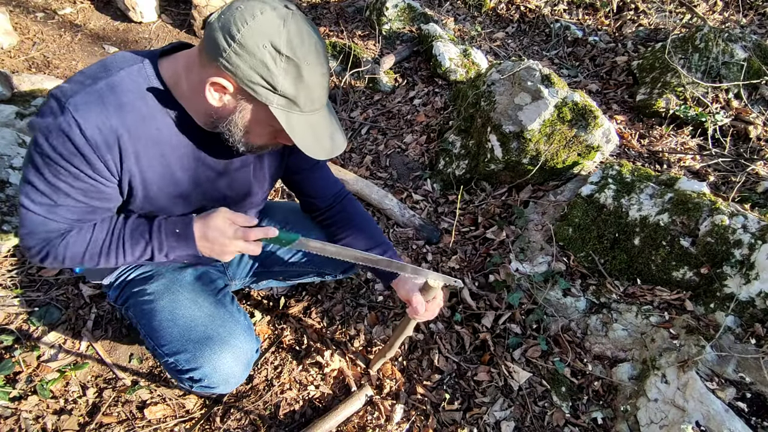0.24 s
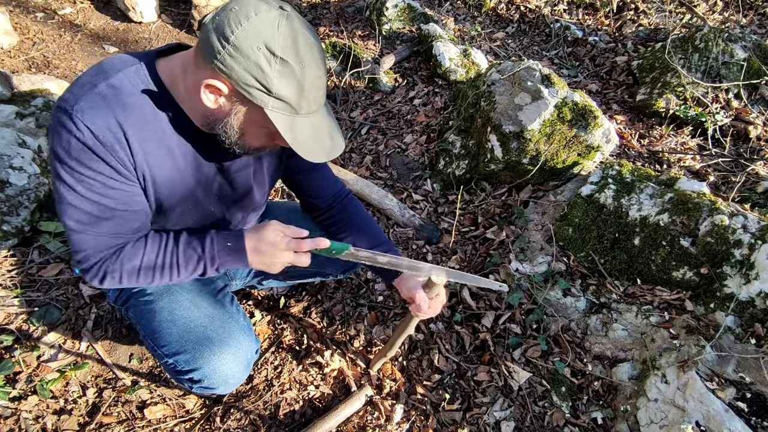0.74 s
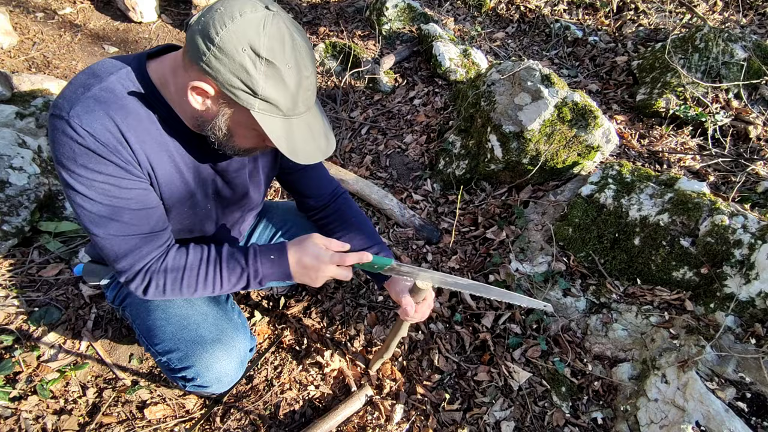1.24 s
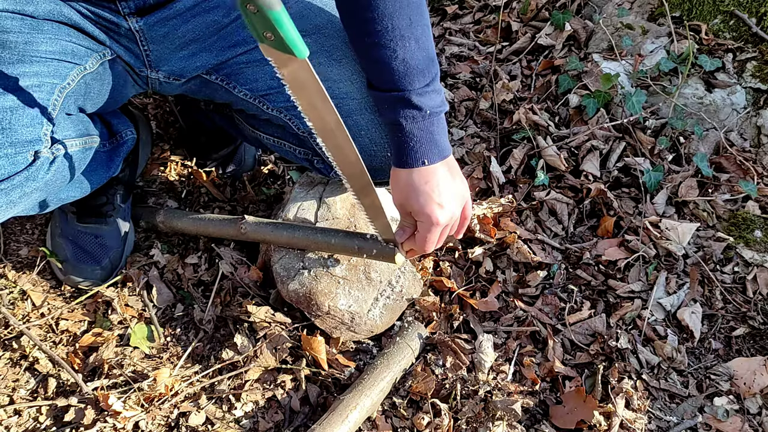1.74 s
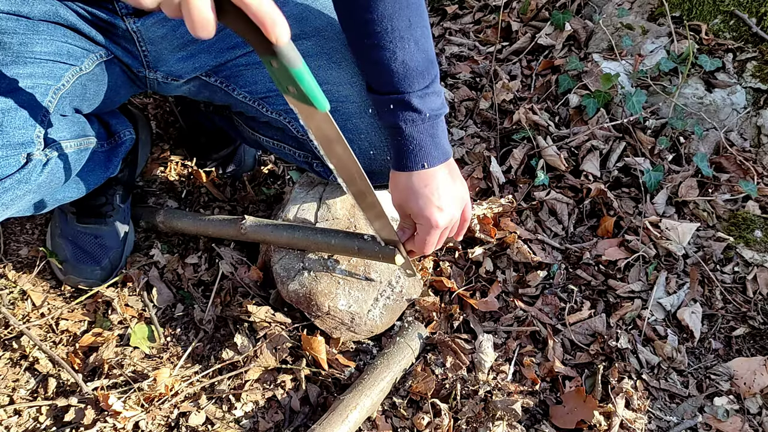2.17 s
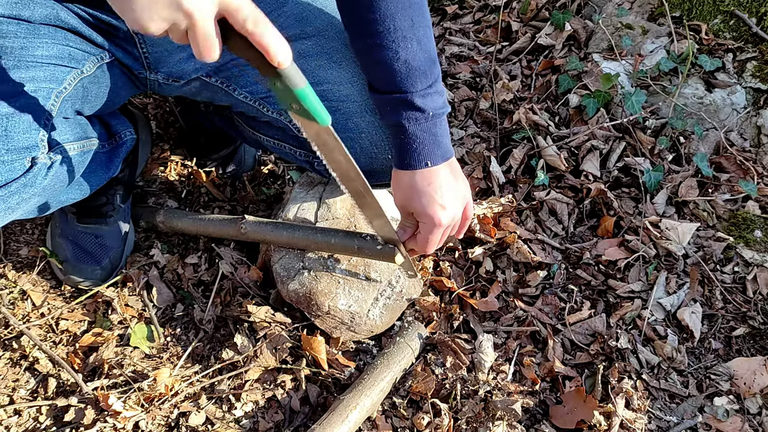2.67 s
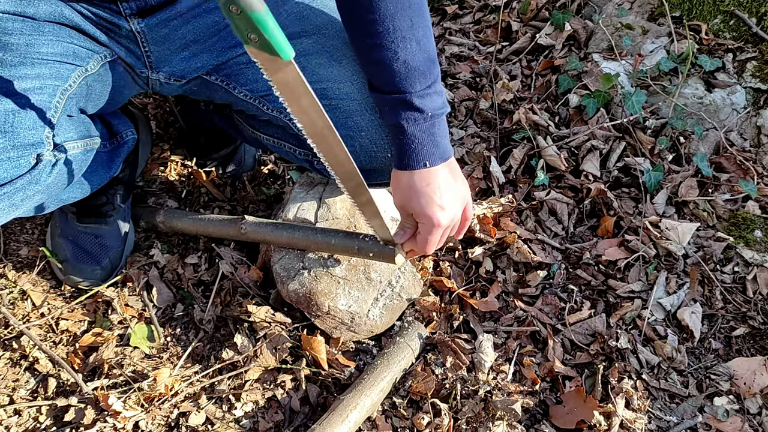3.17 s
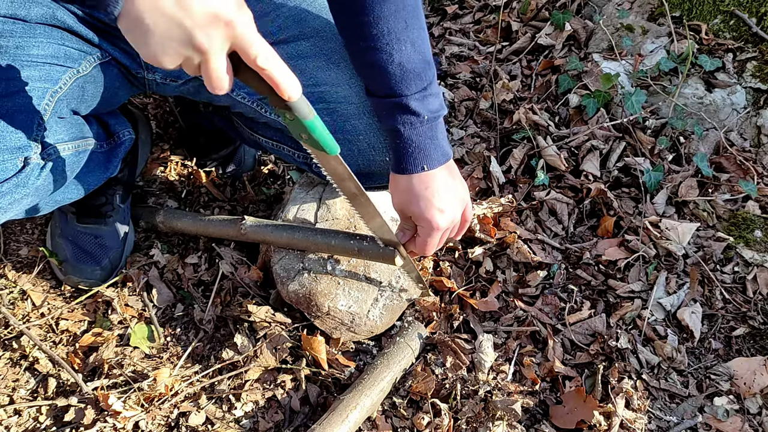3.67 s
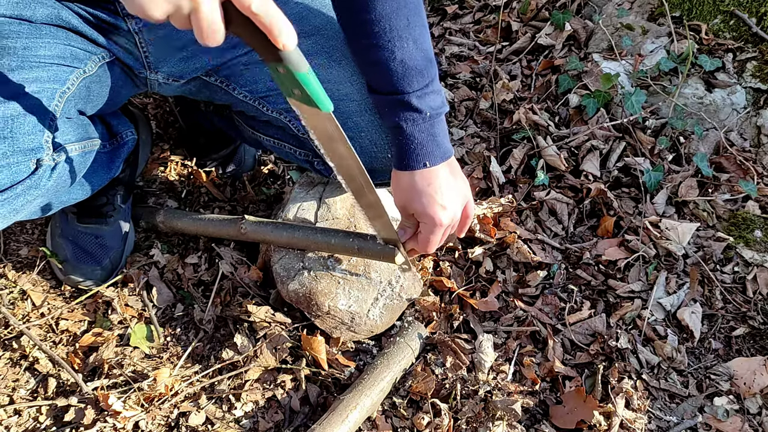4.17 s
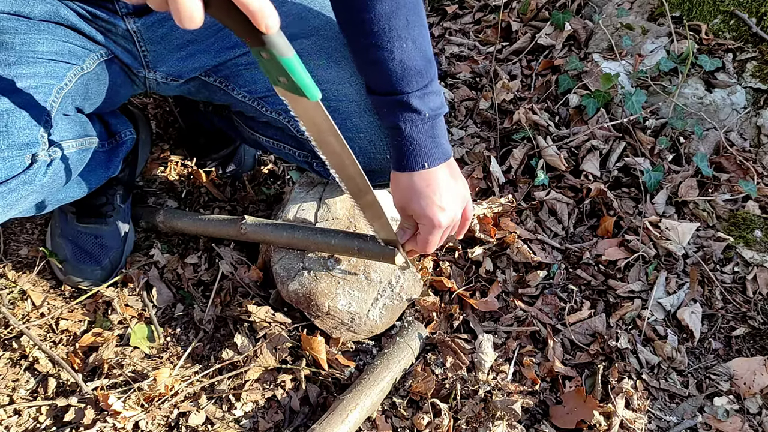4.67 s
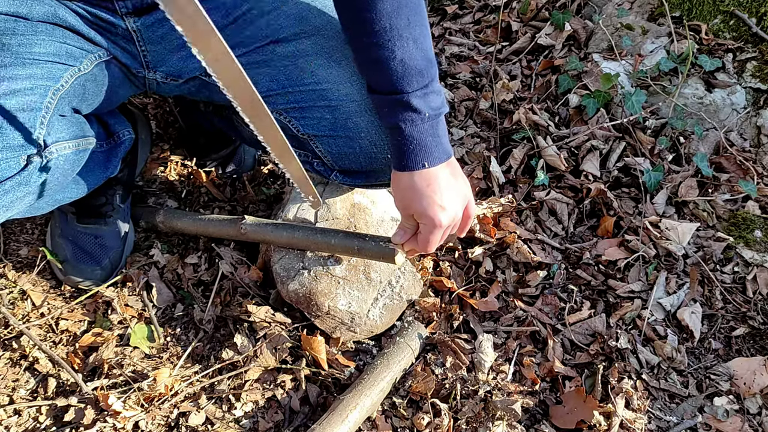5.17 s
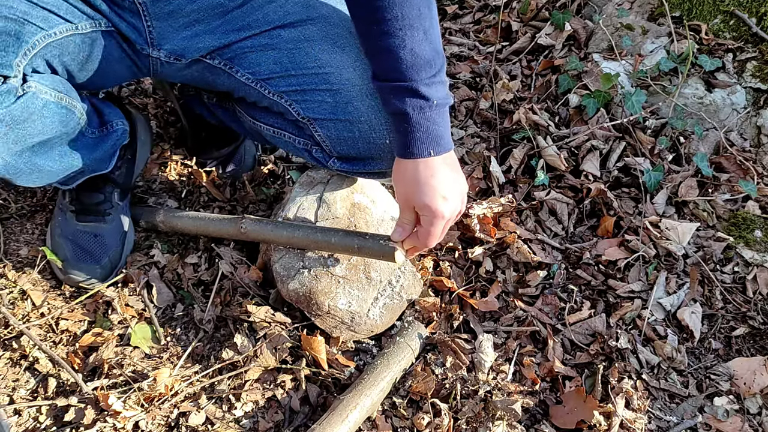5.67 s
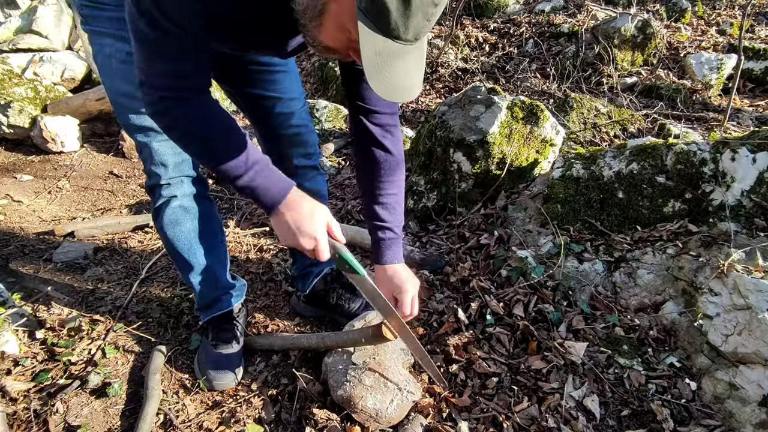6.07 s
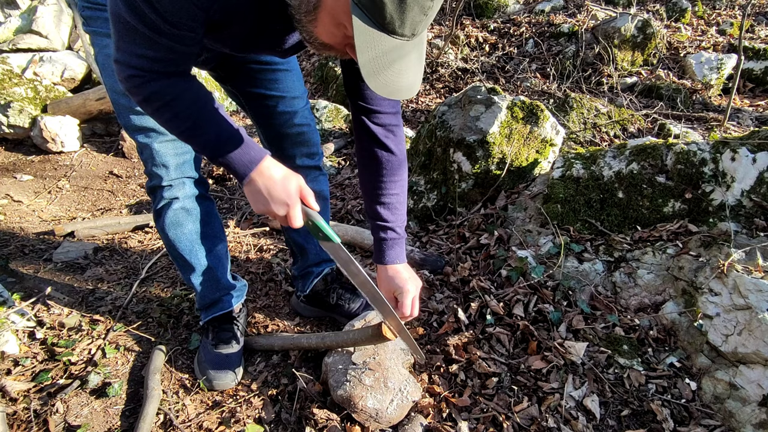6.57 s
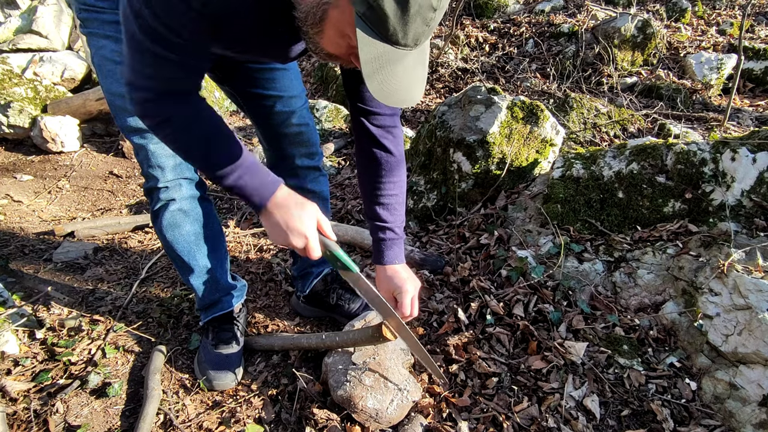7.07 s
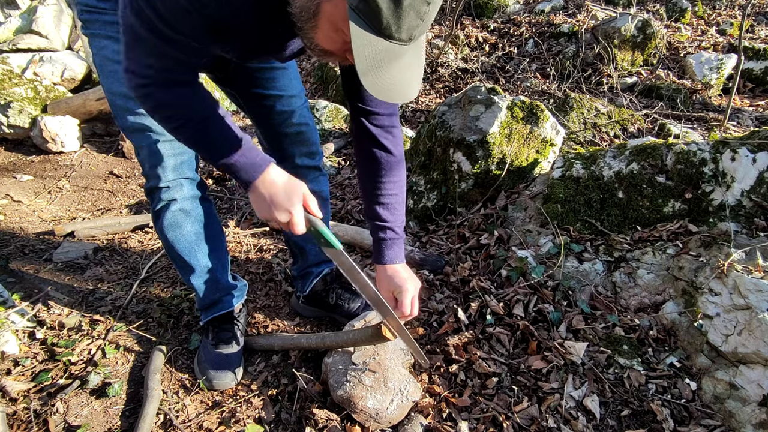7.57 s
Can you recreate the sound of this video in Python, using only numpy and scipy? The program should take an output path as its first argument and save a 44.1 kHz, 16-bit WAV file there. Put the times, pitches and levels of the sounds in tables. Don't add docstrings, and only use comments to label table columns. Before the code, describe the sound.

Slow sawing of fresh wood quickens to brisk rasps under microphone wind bursts, then turns loud, fast and juddering in a quiet forest.

```python
import sys
import numpy as np
from scipy import signal
from scipy.fft import rfft, irfft
from scipy.io import wavfile
from scipy.ndimage import uniform_filter1d

SR = 44100
rng = np.random.default_rng(int(sys.argv[2]) if len(sys.argv) > 2 else 0)


def amplitude_ratio(level_db):
    exponent = np.asarray(level_db, float) / 20
    return 10 ** exponent


def to_wav(sig):
    pcm = np.clip(np.atleast_2d(sig), -1, 1) * 32767
    pcm = np.round(pcm).astype(np.int16)
    wavfile.write(sys.argv[1], SR, pcm.T)


N = 344862
T = np.arange(N) / SR
HZ = np.fft.rfftfreq(N, 1 / SR) + 1

# (start [s], tooth spacing scatter [0-1], tooth size scatter [dB], fibre thud [dB], hush [dB])
PLACES = [
    (0, 0.09, 3.5, -3.5, -63),
    (1.326, 0.04, 2, -1, -62.5),
    (5.844, 0, 3, 0.5, -61.5),
]
# (frequency [Hz], width [Hz], level [dB])
BRANCH_MODES = [
    [(294.5, 81.2, -0.5), (410, 81, -6.5), (595, 117, -11), (774.3, 83, -9), (1100, 520, -33.5)],
    [(200, 114, -3.5), (318, 135, 0), (379.7, 58.6, -0.5), (686, 100, -17.5), (1059, 540, -22)],
    [(160, 115, -10.5), (295.9, 105, -2), (412, 96.2, -6), (579, 33.3, -13), (880, 330, -55),
     (1150, 113, -18.5)],
]
# (frequency [Hz], density [dB per Hz])
HISS_COLOUR = [(290, -32), (500, -5.5), (1240, -5), (1850, -11), (2800, -12), (7130, -7), (8240, -1),
               (11100, -7.5), (15500, -19)]
# (frequency [Hz], width [Hz], level [dB])
BLADE_MODES = [(1820, 105, -3), (2700, 300, 1.5), (3040, 260, 3), (3840, 840, 3), (4634, 176, 4.5),
               (5180, 104, 13.5), (5250, 100, -9.5), (6230, 340, 1.5), (6710, 250, 5), (7140, 270, 4),
               (12265, 575, 6), (12230, 146, -2), (13200, 376, 0), (13150, 200, 1), (13930, 350, 6),
               (14600, 350, 13.5), (15400, 450, -12)]
# (frequency [Hz], width [Hz], level [dB])
PORT_CAVITIES = [
    [(6550, 280, 5.5), (7790, 2570, -12), (9484, 324, 1), (10250, 1300, 3.5), (11300, 270, -13)],
    [(7170, 392, -8), (8140, 1040, 3.5), (9510, 230, -13), (10880, 780, -10), (11350, 350, -5.5)],
]
# (frequency [Hz], density [dB per Hz])
HUSH_COLOUR = [(180, -28), (300, -6), (1560, -15), (2000, -21), (4800, -24.5), (7370, -27), (8280, -25),
               (11100, -28), (12100, -29.5), (15500, -32)]
# (time [s], left level [dB], right level [dB])
WIND_LEVELS = [(0.1, -57, -53), (0.4, -58, -61), (1.0, -51.5, -55.5), (1.251, -55, -58), (1.45, -51, -48.5),
               (2.0, -54, -54.5), (2.35, -54.5, -55.5), (2.9, -63, -60), (3.3, -54, -51.5),
               (3.6, -53, -43.5), (3.95, -57, -42.5), (4.3, -46.5, -53), (5.0, -53.5, -52),
               (5.201, -50.5, -41), (5.7, -49.5, -57), (6.1, -58, -49.5), (6.5, -64, -63.5),
               (7.82, -66, -62)]
# (frequency [Hz], density [dB])
WIND_COLOUR = [(20, -34), (45, -8.5), (75, 0), (110, 0), (170, -5.5), (260, -13), (450, -30.5),
               (1000, -73.5)]
# (frequency [Hz], correlation [0-1])
LIKENESS = [(300, 0.93), (1200, 0.52), (2000, 0.04), (4000, 0.73), (6000, 0.11), (15000, 0)]
# (start [s], length [s], hiss [dB], knock [dB], tooth rate at full speed [Hz])
SLOW_STROKES = [
    (-0.13, 0.3663, -42, -64, 164.6),
    (0.295, 0.33, -45, -59.5, 147),
    (0.66, 0.37, -43, -61.5, 151.2),
    (1.07, 0.391, -47, -60, 149.3),
]
BRISK_STROKES = [(1.311, 0.1706, -44, -51, 129.4), (1.493, 0.15, -43, -48.5, 145.5),
                 (1.631, 0.2206, -46.5, -52.5, 133.3), (1.828, 0.17, -44.5, -49, 140),
                 (1.983, 0.1989, -46.5, -52, 135.5), (2.162, 0.1593, -42, -48.5, 143.2),
                 (2.336, 0.1758, -45.5, -52, 124.1), (2.52, 0.1482, -42.5, -48.5, 150.6),
                 (2.694, 0.17, -45.5, -54, 124.9), (2.9, 0.14, -43.5, -49, 135.5),
                 (3.074, 0.19, -44, -51, 140), (3.255, 0.19, -43, -50.5, 147.4),
                 (3.452, 0.17, -44.5, -51, 135), (3.618, 0.16, -42.5, -48.5, 150.8),
                 (3.789, 0.2, -45.5, -54.5, 128.9), (3.981, 0.1608, -42, -49, 141),
                 (4.146, 0.19, -45.5, -52.5, 127), (4.339, 0.16, -42.5, -50, 140.2),
                 (4.525, 0.16, -43.5, -49, 142.5), (4.693, 0.19, -43.5, -48, 129)]
BREAKTHROUGH = [
    (4.91, 0.2, -46, -49, 125.2),
    (5.075, 0.07, -40.5, -48.5, 129.5),
]
SCRAPES = [
    (5.74, 0.07, -52, -72.5, 149.8),
    (5.847, 0.035, -44.5, -51.5, 200),
]
HARD_STROKES = [(5.885, 0.18, -37, -56.5, 151.1), (6.073, 0.16, -37.5, -44, 155.5),
                (6.228, 0.18, -38, -58, 163.9), (6.412, 0.16, -37, -40.5, 190.5),
                (6.558, 0.17, -37.5, -48.5, 179.7), (6.735, 0.16, -35, -40, 200),
                (6.882, 0.18, -36, -45, 171.8), (7.063, 0.17, -34.5, -42.5, 209.7),
                (7.226, 0.17, -37, -43, 179.9), (7.399, 0.17, -34.5, -42.5, 208.6),
                (7.566, 0.1714, -36.5, -51, 156.6), (7.743, 0.19, -35, -50.5, 191.3)]
# (full pressure at share [0-1], full speed at share [0-1], speed lost at the ends [0-1],
# knock rise over the stroke [dB], softness of the ends [0-3])
DRAG = (0.19, 0.6, 0.2127, -4, 0.92)
PUSH, PULL = (0.59, 0.52, 0.75, 0.1, 1.33), (0.7393, 0.62, 0.7, 12, 1.687)
BREAK, GRAZE = (0.581, 0.6, 0.5, 1.9, 1.05), (0.26, 0.1455, 0.9, -16, 1.3)
HARD_PUSH, HARD_PULL = (0.46, 0.4, 0.4, 3.2, 1.33), (0.67, 0.55, 0.75, 2.06, 1.74)
SAWING = [(SLOW_STROKES, [DRAG]), (BRISK_STROKES, [PUSH, PULL]), (BREAKTHROUGH, [BREAK]),
          (SCRAPES, [GRAZE]), (HARD_STROKES, [HARD_PUSH, HARD_PULL])]
# (centre [s], half length [s], knock [dB], tooth rate [Hz])
CHATTER = [(5.946, 0.0151, -32.5, 160), (5.967, 0.013, -30, 124.7), (6.005, .03, -40.5, 124.3),
           (6.166, .028, -36.5, 152.2), (6.318, 0.02097, -32.5, 148.5), (6.488, .012, -40.5, 154.2),
           (6.534, 0.013, -55, 154.9), (6.851, 0.0154, -57.5, 157.5), (7.009, .028, -36, 152.9),
           (7.124, .012, -43.5, 160), (7.343, 0.01842, -50, 164.6), (7.478, 0.0088, -46, 160),
           (7.539, 0.01566, -47, 145.1), (7.666, 0.029, -33.5, 154.2), (7.815, 0.013, -39.5, 147.7)]
# (time [s], peak level [dB])
PUFFS_LEFT = [(0.502, -35), (2.123, -33), (2.153, -33.5), (3.926, -34), (4.144, -36.5), (4.25, -33.5),
              (4.281, -32), (4.31, -28), (4.437, -30), (4.472, -36), (4.539, -32.5), (5.053, -39),
              (5.102, -39), (5.221, -34), (5.3, -24), (5.332, -40), (5.382, -32), (5.403, -40.5),
              (5.433, -38), (5.563, -40), (5.67, -40)]
PUFFS_RIGHT = [(1.473, -32.5), (1.552, -38), (1.703, -34), (1.981, -36), (2.58, -27), (3.358, -28),
               (3.382, -29), (3.546, -28), (3.569, -26), (3.599, -22), (3.629, -28), (3.654, -24.5),
               (3.724, -25), (3.811, -17), (3.882, -26), (3.919, -29), (4.098, -30), (4.429, -29.5),
               (4.764, -33.5), (5.103, -32), (5.149, -23), (5.185, -27), (5.241, -45), (5.586, -22.5),
               (5.602, -23.5)]

PUFF_HZ = 117.5
TOP_HZ = 15700
PATCH_DB, PATCH_FROM_HZ = 3, 1490
HOLE_DB, HOLE_RARITY = -45, 1.0
SWAY_DB = -9.5
CUT_S = 0.0092
THUD_SPREAD_DB, GUST_SPREAD_DB, FIBRE_SPREAD_DB = 4, 1.5, 1.8


def unit(x):
    return x / np.sqrt(np.mean(x ** 2))


def slope(points):
    hz, value = np.transpose(points)
    return np.interp(np.log(HZ), np.log(hz), value)


def bumps(modes):
    return sum(db / (1 + (2 * (HZ - hz) / width) ** 2) for hz, width, db in modes)


def tint(x, db):
    return irfft(rfft(x) * amplitude_ratio(db), N)


def walk(rate):
    hold = int(SR / rate)
    steps = np.repeat(rng.standard_normal(N // hold + 1), hold)
    slewed = uniform_filter1d(uniform_filter1d(steps, hold), hold)
    return unit(slewed[:N])


def pair():
    like = np.clip(slope(LIKENESS), 0, 0.999)
    mid, side = rfft(rng.standard_normal((2, N))) * np.sqrt([1 + like, 1 - like])
    return irfft([mid + side, mid - side], N) / np.sqrt(2)


def ring(x, modes):
    out = 0
    for k, (hz, width, db) in enumerate(modes):
        b, a = signal.iirpeak(hz, hz / width, SR)
        out = out + (-1) ** k * amplitude_ratio(db) * signal.lfilter(b, a, x)
    return out


def saw_strokes():
    hiss, knock, rate = np.zeros(N), np.zeros(N), np.full(N, 60.0)
    for table, habits in SAWING:
        for k, (start, length, hiss_db, knock_db, hz) in enumerate(table):
            full, fastest, bend, rise_db, soft = habits[k % len(habits)]
            on = (T >= start) & (T < start + length)
            u = (T[on] - start) / length
            pressure = np.where(u < full, u / full, (1 - u) / (1 - full))
            hiss[on] = amplitude_ratio(hiss_db) * np.sin(np.pi / 2 * pressure) ** soft
            knock[on] = amplitude_ratio(knock_db + rise_db * (u - 0.5)) * np.sin(np.pi * u)
            rate[on] = hz * np.clip(1 - bend * (2 * (u - fastest)) ** 2, 0.3, 1)
    return hiss, knock, rate


def branch_knocks(knock, rate, loose, place):
    scatter, size_db, thud_db = np.array(PLACES)[place, 1:4].T
    cycles = np.cumsum(rate * (1 + scatter * loose * walk(120))) / SR
    tooth = cycles.astype(int)
    sizes = amplitude_ratio(size_db * loose * rng.standard_normal(N // 50)[tooth])
    blows = np.diff(tooth, prepend=0) * sizes * np.sqrt(SR / rate)
    thuds = loose * amplitude_ratio(thud_db + THUD_SPREAD_DB * walk(40)) * pair()
    sway = (1 - loose) * amplitude_ratio(SWAY_DB) * np.cos(4 * np.pi * cycles)
    force = knock * (blows + thuds + sway)
    wood = sum(ring(force * (place == k), modes) for k, modes in enumerate(BRANCH_MODES))
    return amplitude_ratio(20.5) * wood, cycles % 1


def blade_hiss(hiss, phase):
    patches = amplitude_ratio(FIBRE_SPREAD_DB * walk(25) + 0.61 * walk(300))
    pulse = 1 + 0.0433 * np.cos(2 * np.pi * phase)
    low_cut = -10 * np.log10(1 + (600 / HZ) ** 8)
    fibres = unit(tint(pair(), slope(HISS_COLOUR) + bumps(BLADE_MODES) + low_cut))
    return amplitude_ratio(-1.0) * hiss * patches * pulse * fibres


def forest_hush(place):
    leaves = unit(tint(rng.standard_normal((2, N)), slope(HUSH_COLOUR)))
    return leaves * amplitude_ratio(np.array(PLACES)[place, 4] + 0.97 * walk(3.02))


def wind_rumble():
    s, *levels = np.transpose(WIND_LEVELS)
    out = np.zeros((2, N))
    for port in range(2):
        flutter = rng.standard_normal(N) * amplitude_ratio(2.66 * walk(30))
        gust_db = np.interp(T, s, levels[port]) + GUST_SPREAD_DB * walk(5)
        out[port] = unit(tint(flutter, slope(WIND_COLOUR))) * amplitude_ratio(gust_db)
    return out


def wind_puffs():
    out = np.zeros((2, N))
    for port, puffs in enumerate((PUFFS_LEFT, PUFFS_RIGHT)):
        for at, db in puffs:
            on = slice(int((at - 0.03) * SR), int((at + 0.03) * SR))
            turn = PUFF_HZ * (T[on] - at)
            out[port, on] -= amplitude_ratio(db) * np.exp(-(turn / 0.42) ** 2) * np.sin(2 * np.pi * turn)
    return out


def place_dips():
    return np.prod([np.clip(abs(T - row[0]) / CUT_S, 0, 1) for row in PLACES[1:]], axis=0)


def chatter(knock, rate):
    loose = np.ones(N)
    for centre, half, knock_db, hz in CHATTER:
        lock = np.exp(-((T - centre) / half) ** 2)
        knock = knock + amplitude_ratio(knock_db) * lock
        rate = rate + np.sqrt(lock) * (hz - rate)
        loose = loose * (1 - 0.717 * np.sqrt(lock))
    return knock, rate, loose


def scene():
    place = np.searchsorted([row[0] for row in PLACES[1:]], T)
    hiss, knock, rate = saw_strokes()
    knock, rate, loose = chatter(knock, rate)
    wood, phase = branch_knocks(knock, rate, loose, place)
    saw = wood + blade_hiss(hiss, phase)
    saw[0] = np.roll(saw[0], 3)
    return (saw + forest_hush(place) + wind_rumble() + wind_puffs()) * place_dips()


def smooth_cells(shape, bins, frames):
    across = uniform_filter1d(rng.standard_normal(shape), size=bins, axis=0)
    return unit(uniform_filter1d(across, size=frames, axis=1))


def thin_treble(x):
    hz, _, cells = signal.stft(x, SR, nperseg=1024)
    shape = cells.shape[1:]
    patches = smooth_cells(shape, 4, 5)
    peaks = np.maximum(smooth_cells(shape, 4, 9), smooth_cells(shape, 9, 6) - 0.4)
    holes = np.clip(6 * (peaks - HOLE_RARITY), 0, 1)
    treble = np.clip(hz / PATCH_FROM_HZ - 0.5, 0, 1)[:, None]
    gain = amplitude_ratio((PATCH_DB * patches + HOLE_DB * holes) * treble)
    return signal.istft(cells * gain, SR, nperseg=1024)[1][:, :N]


def top_cut(x):
    return signal.sosfilt(signal.butter(12, 16560, fs=SR, output="sos"), x)


def record(dry):
    trim = -10 * np.log10(1 + (55 / HZ) ** 6) - 40 * (HZ > TOP_HZ)
    ports = np.array([tint(x, bumps(modes) + trim) for x, modes in zip(dry, PORT_CAVITIES)])
    mix = thin_treble(ports)
    return top_cut(mix)


dry = scene()
out = record(dry)
to_wav(out)
```